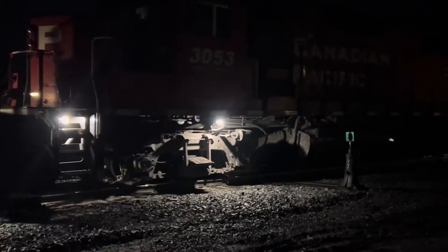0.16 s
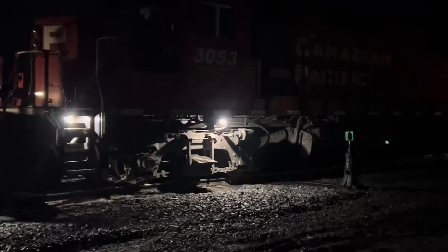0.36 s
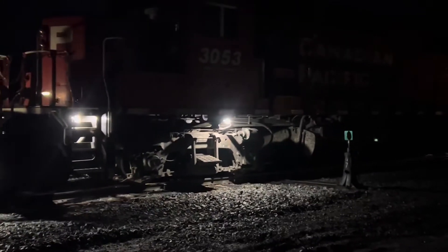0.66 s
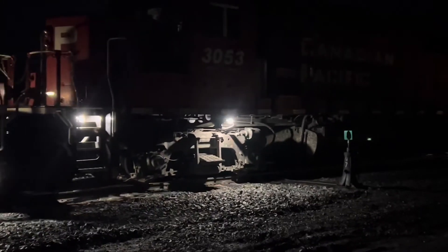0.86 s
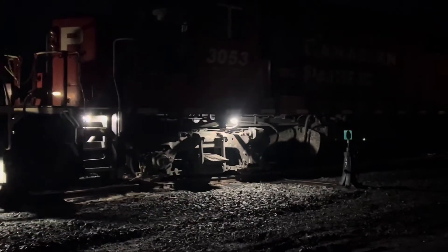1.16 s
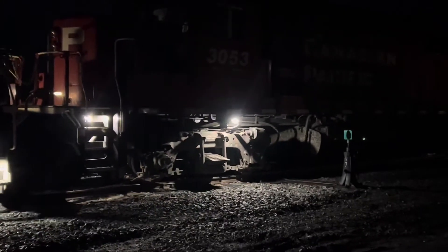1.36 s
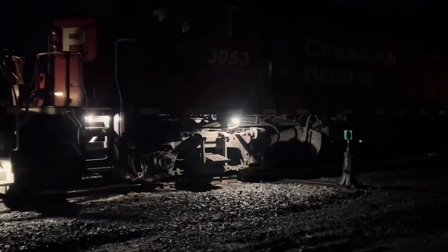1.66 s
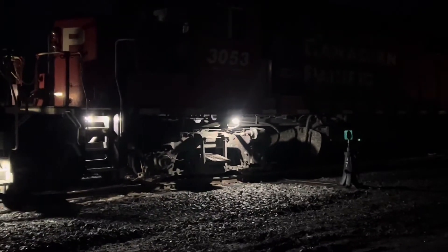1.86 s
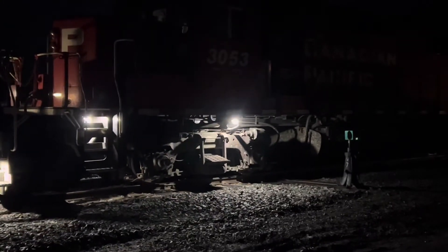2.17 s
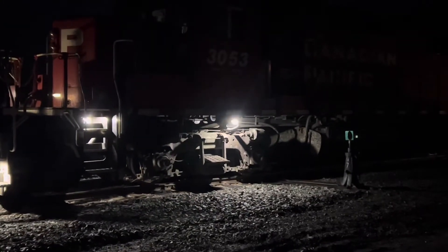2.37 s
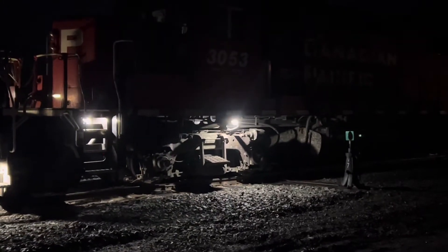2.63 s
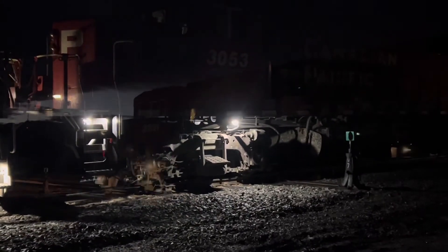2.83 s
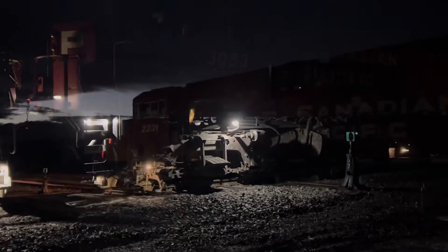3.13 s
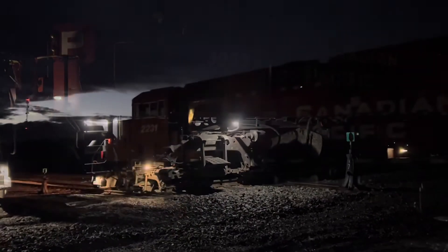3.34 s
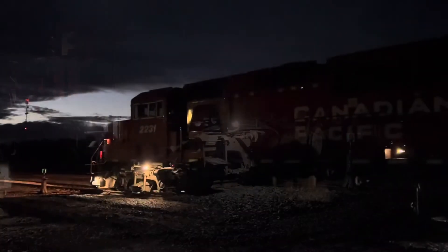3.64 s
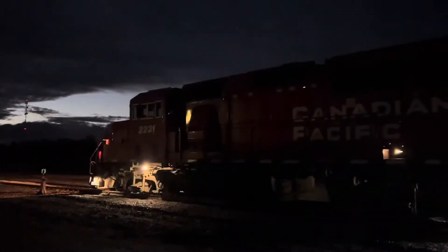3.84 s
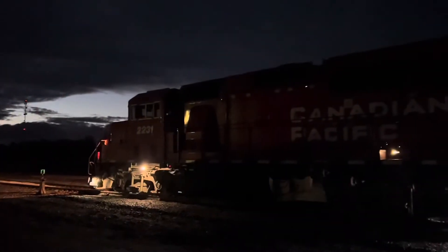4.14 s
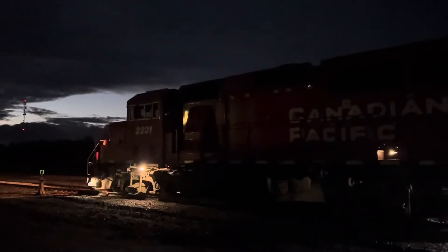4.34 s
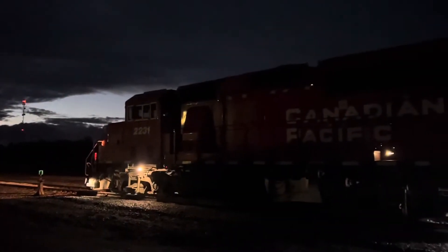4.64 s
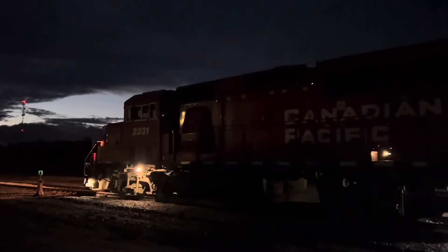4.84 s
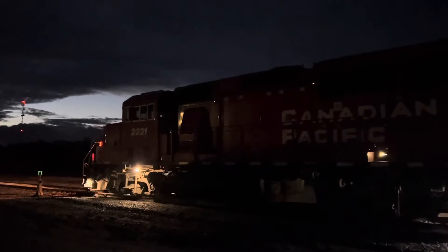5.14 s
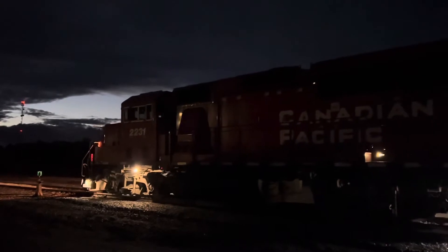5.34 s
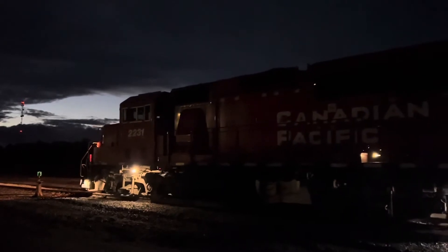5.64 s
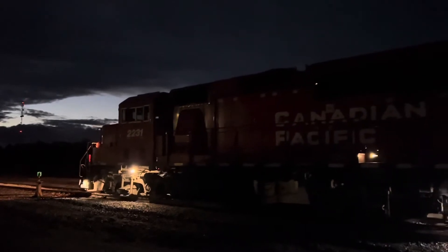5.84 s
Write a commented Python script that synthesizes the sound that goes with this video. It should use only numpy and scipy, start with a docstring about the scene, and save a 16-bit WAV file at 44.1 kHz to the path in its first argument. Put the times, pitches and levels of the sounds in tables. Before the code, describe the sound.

Outdoors in a gravel rail yard, a diesel locomotive idles with low uneven chugging and faint whines. Wheels thud softly, then slack couplings slam in a ragged cluster of metallic clanks and squeaks with a thin air hiss. After about three seconds it crossfades to closer engines, a louder deep throbbing boom with machinery rush, fan whine, a soft air puff and a tiny spit. Stereo handheld microphone.

```python
"""Diesel locomotives in a rail yard

A locomotive creeps by with a lumpy idle made of uneven firing kicks, gusts of noise and steady whines.
Its wheels thud and roar, steel squeaks, and the slack in the couplings runs in with ringing clanks and a
hiss of air. It fades as a closer set comes in: three exhausts, each a sum of crankshaft tones, beat
against each other under fan and turbocharger whine, and an air valve puffs and spits filtered noise.
"""
import sys
import numpy as np
from scipy import signal
from scipy.fft import rfft, irfft
from scipy.io import wavfile

SR = 44100
rng = np.random.default_rng(int(sys.argv[2]) if len(sys.argv) > 2 else 0)


def unload_wav(signal):
    """Save mono or channel-first audio to the path in sys.argv[1] as 16-bit WAV at rate SR, clipped to [-1, 1]."""
    wavfile.write(
        sys.argv[1],
        SR,
        np.round(np.clip(np.atleast_2d(signal).T, -1, 1) * 32767).astype(np.int16),
    )


N = 264600
TIME = np.arange(N) / SR
BINS = np.fft.rfftfreq(N, 1 / SR)

# How loud the creeping train's engine is. Each row: time in seconds, level change in dB.
CREEP_LEVEL = [(0, -1), (.5, 0), (1, 2), (1.9, -2), (2.4, 0), (3, -1.5), (3.35, -6), (3.75, -11)]
# Tone colour of the creeping engine's exhaust. Each row: frequency in Hz, relative level in dB per Hz.
CREEP_EXHAUST = [(22, -39), (33, -17), (42, -0.5), (60, 7.5), (90, 1), (120, -4), (180, -8.5), (300, -22.5),
                 (450, -21.5), (800, -42), (2000, -68.5)]
# Tone colour of its machinery. Each row: frequency in Hz, relative level in dB per Hz.
CREEP_MACHINE = [(100, -13), (250, -4.5), (450, 0), (560, -5.5), (760, -4.5), (900, -11), (1700, -16),
                 (2000, -14), (2400, -20.5), (3500, -27.5), (4300, -33.5), (8500, -37.5), (12000, -50),
                 (16000, -53)]
# The creeping engine's steady tones. Each row: frequency in Hz, level in dB before the level curve.
CREEP_TONES = [(40.1, -21.5), (122, -31.5), (155.5, -34.5), (166, -37), (350, -40), (376.8, -43),
               (457.6, -43.5), (646, -44.5), (791.3, -49.5), (1184, -50.5), (2191, -56), (3698, -62)]

# How loud the close set of engines is. Each row: time in seconds, level change in dB.
CLOSE_LEVEL = [(2.8, -26.5), (3.05, -11), (3.3, -3.5), (3.5, -1), (3.75, 1.5), (4.3, 1.5), (5, 1.5),
               (6, 1.5)]
# Tone colour of their machinery. Each row: frequency in Hz, relative level in dB per Hz.
CLOSE_MACHINE = [(30, -3.5), (60, 7), (110, 6), (250, 1), (490, -2), (550, -9.5), (730, -3), (790, -14),
                 (950, -11), (1450, -14.5), (1700, -11.5), (1870, -16), (2300, -20.5), (4200, -22),
                 (4900, -27.5), (6900, -29), (8500, -32), (12000, -34.5), (16000, -49.5)]
# Their gears and turbochargers. Each row: frequency in Hz, level in dB before the level curve.
CLOSE_TONES = [(646.0, -42.5), (909.8, -52), (990, -51.5), (1292, -48), (2509, -56.5), (2920, -56.5),
               (3300, -55), (3553, -56.5), (4560, -59), (5017, -58)]
# Crankshaft tones of the steady engine. Each row: multiple of the turning rate, level in dB before the curve.
STEADY_ORDERS = [(8, -12), (9, -21), (10, -41), (11, -34), (15, -38), (16, -26), (17, -35), (18, -38),
                 (19, -45), (22, -35.5)]
# Crankshaft tones of the rising engine. Each row: multiple of the turning rate, level in dB before the curve.
RISING_ORDERS = [(7, -27), (8, -17.5), (16, -38.5)]
# Crankshaft tones of the trailing engine. Each row: multiple of the turning rate, level in dB before the curve.
TRAILING_ORDERS = [(8, -28)]
# The rising engine's cooling fan whines up, sinks back, then grows again.
# Each row: time in seconds, level in dB before the level curve.
FAN_LEVEL = [(3.4, -43), (3.75, -36.5), (4, -46), (4.7, -45), (5.05, -40), (6, -38.5)]

# Couplings clank. Each row: start in seconds, level in dB, rise in seconds, time to fall 60 dB in seconds,
# brightest frequency in Hz, width in octaves.
CLANKS = [(.9, -33.5, 0.028, 0.38, 2740, 0.51), (.955, -34, 0.023, .7, 2750, 0.6),
          (1.139, -25, 0.026, 0.62, 1600, 0.88), (1.17, -51, 0.045, 0.96, 7000, .7),
          (1.206, -32, 0.028, 0.51, 1110, 0.93), (1.384, -15, 0.02, 0.71, 960, 1.05),
          (1.407, -22, 0.0054, 0.18, 2640, 0.87), (1.424, -19, 0.0078, 0.17, 3500, 0.93),
          (1.446, -18, 0.004, 0.087, 4000, 1.3), (1.471, -16.5, 0.0056, 0.067, 1060, 1.1),
          (1.5, -34, 0.023, 0.65, 2400, 0.84), (1.553, -31.5, .005, 0.13, 2800, 1.3),
          (1.605, -33.5, .006, 0.14, 2620, 1.2), (1.645, -25, 0.005, 0.054, 7000, 1.1),
          (1.76, -37, 0.008, 0.25, 5200, .28)]
# What the steel rings with. Each row: frequency in Hz, relative level in dB.
STEEL = [(790, 8.5), (1060, 2.5), (1190, 2), (1360, 4.5), (1830, -2), (2380, 0), (2536, -0.5), (2848, 6),
         (3257, 6.5), (3548, 8), (3790, 0), (4610, 6), (4963, 4), (5152, 1), (5599, 0.5), (6045, -1),
         (6745, 7.5), (8150, 9)]
# Steel rubs on steel and squeaks. Each row: start in seconds, level in dB, pitch in Hz, length in seconds.
SQUEAKS = [(.22, -70, 8300, 0.04), (1.03, -49, 3180, 0.11), (0.973, -43.5, 3570, 0.043),
           (1, -53, 7560, .09), (1.221, -30, 1500, 0.066), (1.226, -37, 1347, 0.084),
           (1.345, -55, 11600, 0.035), (1.398, -28, 3790, 0.032), (1.406, -34, 1830, .025),
           (1.413, -27, 2400, 0.031), (1.466, -30.5, 6760, 0.043), (1.455, -44, 5530, 0.086),
           (1.48, -33, 2800, 0.086), (1.5, -38, 6000, .05), (1.587, -43, 6060, .06),
           (1.512, -30.5, 3270, 0.029), (1.555, -39, 4963, 0.071), (1.58, -39, 4760, 0.05),
           (1.594, -38, 3270, 0.051), (1.585, -41, 8165, 0.047), (1.76, -37, 5160, 0.031),
           (1.768, -44, 5260, 0.026), (1.785, -43, 4700, 0.025), (1.87, -56, 5160, 0.036),
           (2.356, -60, 3700, .12), (2.555, -50.5, 3180, 0.083)]
# Wheels thud on the track. Each row: start in seconds, strength in dB, ring of the frame in Hz.
THUDS = [(0.05, -12.5, 148), (0.149, -13, 179), (0.269, -7.5, 86.3), (0.301, -8.5, 73.6),
         (0.771, -10.5, 67.7), (0.879, -11, 109.5), (1.055, -12.5, 114), (1.141, -16.5, 134),
         (1.241, -16.5, 141), (1.478, -10, 109), (1.512, -5, 112.3), (1.595, -12.5, 111),
         (2.278, -13.5, 61.5), (2.561, -21, 267), (3.028, -16.5, 58.6)]
# Wheels grind harder as the wagons are shoved. Each row: start in seconds, length in seconds, level in dB.
SURGES = [(0.02, 0.24, -25.5), (0.878, 0.049, -23), (1, 0.08, -30.5), (1.164, 0.058, -16),
          (1.356, 0.7, -22)]
# Air escapes. Each row: start in seconds, level in dB, rise in seconds, length in seconds, fall in seconds,
# brightest frequency in Hz, width in octaves.
AIR = [(1.448, -35.5, 0.028, 0.19, 0.12, 5850, .8), (3.694, -29, 0.071, 0.075, 0.14, 6800, 1),
       (4.608, -24, 0.0027, 0.0024, 0.023, 8350, 1)]

# How the two microphone ports hear the creeping train.
# Each row: frequency in Hz, likeness from 0 to 1, lead of the left in radians.
CREEP_IMAGE = [(45, 1, 0.044), (120, 0.96, 0.36), (330, 0.9, -0.43), (570, 1, 0.84), (650, 0.32, 0.97),
               (757, 0.99, -1.2), (1080, 0.98, -0.79), (1900, 1, 0.041), (3400, 1, 0.46), (6000, 1, 0.38),
               (8400, 1, -0.23), (9400, 1, 0.54), (11150, 1, -0.65), (15000, 0.62, -1.1)]
# How the ports hear the close set.
# Each row: frequency in Hz, likeness from 0 to 1, lead of the left in radians.
CLOSE_IMAGE = [(60, 0.83, 0.14), (130, 0.69, 0.31), (288, 0.92, 0.21), (580, 0.2, 1.14), (810, 0.35, -2),
               (1280, 0.23, -2.27), (1740, 0.53, 0.63), (2830, 0.42, 1.23), (4200, 0.38, 0.037),
               (5940, .2, 0.5), (6950, 0.84, -1.1), (8600, .4, -0.14), (9300, 1, -0.05), (10870, 1, 0),
               (11350, 0.27, 2.6), (13000, 1, 0.38)]
# Loudness balance of the ports. Each row: frequency in Hz, left over right in dB.
PORT_BALANCE = [(60, -1), (200, 1.5), (380, 2), (700, 6), (1290, 2.5), (2400, 0), (15000, 0)]
# The ports' own phase difference in the high treble. Each row: frequency in Hz, added left lead in radians.
PORT_TWIST = [(7500, 0), (8600, -1), (9300, -3.14), (10900, -3.14), (12400, -6.28), (14500, -6.28),
              (15700, -9)]

# The close set fires together at this moment; the throb is their beat.
IN_STEP_S = 5.583
FIRINGS_PER_TURN = 8
# Firings a second when in step: one engine holds its speed, the next slowly throttles up, the last rises faster.
STEADY_HZ, RISING_HZ, TRAILING_HZ = 65.35, 59.57, 62.3
RISING_HZ_PER_S, TRAILING_HZ_PER_S = 1.26, 2.2
# The fan turns with the rising engine; this is its pitch at the moment the engines are in step.
FAN_HZ = 589.6
# A gear of the steady engine howls once in every turn of the crankshaft.
GEAR_HZ, GEAR_DB, GEAR_THROB = 723, -42.5, 0.38
SURGE_RISE_S, SURGE_FALL_S, ROLL_DB = 0.034, 0.16, -31.5
EDGE_HZ = 15750  # top of the final band


def amp(db):
    """Turns decibels into gain."""
    return 10 ** (np.asarray(db) / 20)


def unit(x):
    """Scales a sound to an average (rms) level of 1."""
    return x / np.sqrt(np.mean(x ** 2) + 1e-20)


def over_hz(points):
    """Reads a table at every frequency, on a log axis."""
    hz, value = np.transpose(points)
    return np.interp(np.log(BINS + 1), np.log(hz + 1), value)


def over_time(points):
    """Reads a curve at every sample."""
    return np.interp(TIME, *np.transpose(points))


def colour(x, gain):
    """Filters by a gain per frequency, then scales to rms 1."""
    return unit(irfft(rfft(x) * gain, N))


def hump(hz, octaves):
    """Gives the gains of a smooth band around hz."""
    distance = np.log2((BINS + 1) / hz) / octaves
    return 1 / (1 + distance ** 2 / 2) ** 2


def wander(hz):
    """Makes a random drift of rms 1 that changes about hz times a second."""
    return colour(rng.standard_normal(N), np.exp(-(BINS / hz) ** 2))


def noise():
    """Makes two unrelated white noises."""
    return rng.standard_normal((2, N))


def whine(tones, drift, flutter, fade_db, speed=1):
    """Tones of turning parts drift with the shaft, come and go, and flutter in two unrelated ways, one for each
    sound of the pair."""
    clock = np.cumsum(speed + drift * wander(4.275)) / SR
    frames = np.arange(0, N + 2000, 2000)
    fading = unit(amp(fade_db * wander(4.7)))
    out = np.zeros((2, N))
    for hz, db in tones:
        shape = (2, len(frames))
        depth = flutter * min(1, hz / 300)
        sway = depth * (rng.standard_normal(shape) + 1j * rng.standard_normal(shape))
        level = np.sqrt(2) * amp(db) * np.roll(fading, rng.integers(N))
        tone = level * np.exp(2j * np.pi * (hz * clock + rng.random()))
        # the complex sway moves both the loudness and the phase
        out += [(tone * (1 + np.interp(np.arange(N), frames, s))).real for s in sway]
    return out


def creeping_engine():
    """Uneven firings push gusts of gas out of the stack; the machinery whirs behind the hood doors."""
    kicks = firings(per_s=40.1, uneven_db=3.0, decay_s=0.028, count=12)
    exhaust_gain = amp(over_hz(CREEP_EXHAUST))
    kick_change = np.diff(kicks, prepend=kicks[0])
    pushes = colour(kick_change, exhaust_gain * hump(hz=49, octaves=3.1))
    gusts = colour(noise() * (1 + kicks), exhaust_gain)
    machine = colour(noise() * (1 + 0.05 * kicks), amp(over_hz(CREEP_MACHINE)))
    sound = amp(-18.5) * gusts + amp(-30) * machine
    sound += whine(CREEP_TONES, drift=0.00202, flutter=0.33, fade_db=3)
    sound[0] += amp(-23.5) * pushes + hood_buzz()
    return sound * amp(over_time(CREEP_LEVEL))


def firings(per_s, uneven_db, decay_s, count):
    """Each firing is a kick that dies away; every cylinder has its own strength."""
    fired = np.cumsum(per_s * (1 + .003 * wander(2))) / SR
    cylinder = fired.astype(int) % count
    strength = amp(uneven_db * rng.standard_normal(count))[cylinder]
    age = (fired % 1) / per_s
    return unit(strength * np.exp(-age / decay_s))


def hood_buzz(hz=2140, width_hz=120, sway_hz=35, flicker_db=2, level_db=-46):
    """A rough resonance in the creeping engine's hood sways in pitch and flickers in level."""
    angle = 2 * np.pi * np.cumsum(hz + sway_hz * wander(9)) / SR
    ring = wander(width_hz) * np.cos(angle) + wander(width_hz) * np.sin(angle)
    return amp(level_db) * unit(ring * amp(flicker_db * wander(40)))


def close_engines():
    """Three exhausts at slightly different speeds beat, so the boom throbs; valve gear clatters twice a turn."""
    since = TIME - IN_STEP_S
    rising_hz = RISING_HZ + RISING_HZ_PER_S * since
    trailing_hz = TRAILING_HZ + TRAILING_HZ_PER_S * since
    crank = crank_angle(STEADY_HZ)
    boom = exhaust(crank, STEADY_ORDERS)
    boom += exhaust(crank_angle(rising_hz), RISING_ORDERS)
    boom += exhaust(crank_angle(trailing_hz), TRAILING_ORDERS)
    # the machinery noise also pulses gently at every firing
    clatter = 1 + 0.066 * np.cos(2 * crank) + 0.056 * np.cos(FIRINGS_PER_TURN * crank)
    machine = colour(noise() * clatter, amp(over_hz(CLOSE_MACHINE)))
    chuffs = colour(noise() * np.maximum(boom, 0) ** 2, hump(hz=304, octaves=1.5))
    fan_speed = rising_hz / RISING_HZ
    fan = whine([(FAN_HZ, 0)], drift=0.00077, flutter=0.13, fade_db=1.4, speed=fan_speed)
    gear = whine([(GEAR_HZ, GEAR_DB)], drift=.0015, flutter=0.22, fade_db=2.0)
    sound = amp(-22.5) * machine + amp(-39.5) * chuffs
    sound += whine(CLOSE_TONES, drift=0.001796, flutter=0.62, fade_db=1.0)
    sound += amp(over_time(FAN_LEVEL)) * fan
    sound += (1 + GEAR_THROB * np.cos(crank)) * gear
    sound[0] += boom
    return sound * amp(over_time(CLOSE_LEVEL))


def crank_angle(firing_hz):
    """Counts the radians a crankshaft has turned since the engines were in step."""
    angle = 2 * np.pi * np.cumsum(firing_hz * np.ones(N)) / SR / FIRINGS_PER_TURN
    return angle - np.interp(IN_STEP_S, TIME, angle)


def exhaust(crank, orders, ragged_db=-33):
    """One stack booms with whole multiples of its crankshaft's turning rate, plus ragged gusts of gas."""
    note = sum(np.sqrt(2) * amp(db) * np.sin(multiple * crank) for multiple, db in orders)
    gusts = colour(rng.standard_normal(N), hump(hz=84, octaves=0.52))
    return note + amp(ragged_db) * gusts


def couplings(ring_hz=17, ring_share=0.45, contacts_per_s=900, count=110):
    """Each clank is a burst of chattering contacts; it rings the main steel and many small loose parts."""
    modes = STEEL + [(hz, -3) for hz in rng.uniform(575, 9000, count)]
    # every mode is a narrow resonance, ring_hz wide to each side, with a random sign
    steel = sum(amp(db) * rng.choice([-1, 1]) / (1 + 1j * (BINS - hz) / ring_hz) for hz, db in modes)
    contacts = rng.random(N) < contacts_per_s / SR
    chatter = noise() * (0.41 + 2.75 * contacts) * amp(1.2 * wander(250))
    blows = np.zeros((2, N))
    for start, db, rise, t60, hz, octaves in CLANKS:
        age = np.maximum(TIME - start, 0)
        fall_db = -60 * np.maximum(age - rise, 0) / t60
        swell = np.minimum(age / rise, 1) * amp(db + fall_db)
        blows += swell * colour(chatter, hump(hz, octaves))
    ring = blows.std() * colour(blows, steel)
    return np.sqrt(1 - ring_share) * blows + np.sqrt(ring_share) * ring


def squeaks(rough=0.33, waver=0.0046, slip_db=4.0, rise_s=0.002, ring_s=.016):
    """Stick and slip catches one mode of the steel, feeds it unevenly for a moment, then lets it ring out."""
    grain = (1 + rough * wander(110)) * unit(amp(slip_db * wander(30)))
    bend = 1 + waver * wander(57.0)
    out = np.zeros((2, N))
    for start, db, hz, length in SQUEAKS:
        span = np.flatnonzero((TIME > start) & (TIME < start + length + 10 * ring_s))
        own = (span + rng.integers(N)) % N  # each squeak reads its own stretch of grain and bend
        age = TIME[span] - start
        grip = (1 - np.exp(-age / rise_s)) * np.exp(-np.maximum(age - length, 0) / ring_s)
        tone = np.sin(2 * np.pi * hz * np.cumsum(bend[own]) / SR)
        out[0, span] += np.sqrt(2) * amp(db) * grip * grain[own] * tone
    return out


def thuds(rise_s=0.0046, decay_s=0.021, knock=0.35):
    """Each wheel blow rings the heavy truck frame for a few cycles, with a dull knock on top."""
    out = np.zeros((2, N))
    rattle = colour(noise(), hump(hz=300, octaves=0.66))
    for start, db, hz in THUDS:
        age = np.maximum(TIME - start, 0)
        blow = amp(db) * (1 - np.exp(-age / rise_s)) * np.exp(-age / decay_s)
        out += knock * blow * rattle
        out[0] += 2 * blow * np.sin(2 * np.pi * hz * age)
    return out


def air_valves():
    """A jet of air swells, holds while the valve is open, and dies away."""
    out = np.zeros((2, N))
    for start, db, rise, length, fall, hz, octaves in AIR:
        age = np.maximum(TIME - start, 0)
        flow = np.minimum(age / rise, 1) * np.exp(-2 * np.maximum(age - length, 0) / fall)
        out += amp(db) * flow * colour(noise(), hump(hz, octaves))
    return out


def rolling(lumpy_db=3.0):
    """Heavy wheels on uneven rail give a lumpy low roar that swells, holds and dies with each shove."""
    power = amp(ROLL_DB + over_time(CREEP_LEVEL)) ** 2
    for start, length, db in SURGES:
        age = np.maximum(TIME - start, 0)
        fall = np.exp(-np.maximum(age - length, 0) / SURGE_FALL_S)
        surge = np.minimum(age / SURGE_RISE_S, 1) * fall
        power = power + (amp(db) * surge) ** 2
    roar = colour(noise() * amp(lumpy_db * wander(14)), hump(hz=188, octaves=0.91))
    return np.sqrt(power) * roar


def yard(x, t60=0.92, wet_db=-10):
    """Scattered echoes come back from the sides of the standing wagons."""
    t = TIME[:SR]
    hits = rng.random((2, SR)) < 600 / SR  # about 600 echoes a second
    taps = rng.standard_normal((2, SR)) * hits * amp(-60 * t / t60) * (t > .01)
    taps /= np.linalg.norm(taps, axis=1, keepdims=True)
    return x + amp(wet_db) * signal.fftconvolve(x, taps, axes=1)[:, :N]


def ports(pair, image):
    """Two unrelated sounds become the partly alike left and right of the microphone."""
    first, second = rfft(pair)
    hz, likeness, lead = np.transpose(image)
    same = np.clip(over_hz(np.c_[hz, likeness]), 0, 1)
    # the first sound reaches both ports alike, the second with opposite signs
    shared = np.sqrt((1 + same) / 2) * first
    apart = np.sqrt((1 - same) / 2) * second
    phase = over_hz(np.c_[hz, lead]) + over_hz(PORT_TWIST)
    # each port takes half of the level and phase difference
    lean = amp(over_hz(PORT_BALANCE) / 2) * np.exp(.5j * phase)
    return irfft(np.array([(shared + apart) * lean, (shared - apart) / lean]), N)


def scene():
    """Adds the creeping train and the close set, each with its own place between the ports."""
    creeping = creeping_engine() + rolling() + thuds() + yard(couplings() + squeaks())
    close = close_engines() + air_valves()
    return ports(creeping, CREEP_IMAGE) + ports(close, CLOSE_IMAGE)


def record(dry):
    """Rounds off the peaks, then cuts everything above the band limit."""
    rounded = dry / (1 + (abs(dry) / .92) ** 8) ** (1 / 8)
    edge = np.clip((EDGE_HZ - BINS) / 200 + .5, 0, 1)  # slopes down over 200 Hz
    return irfft(rfft(rounded) * edge, N)


dry = scene()
out = record(dry)
unload_wav(out)
```